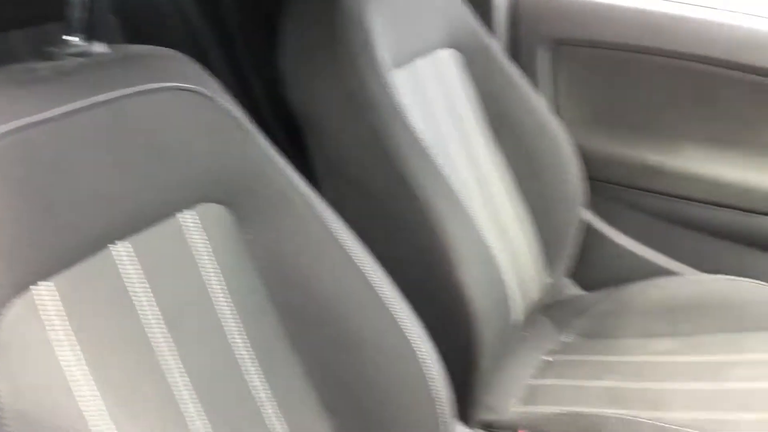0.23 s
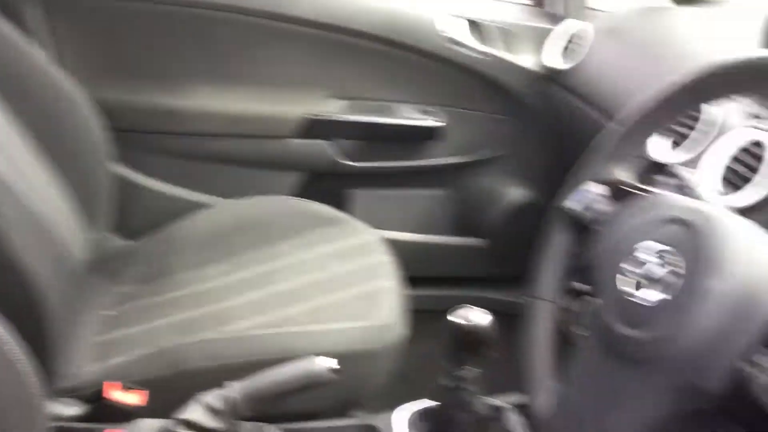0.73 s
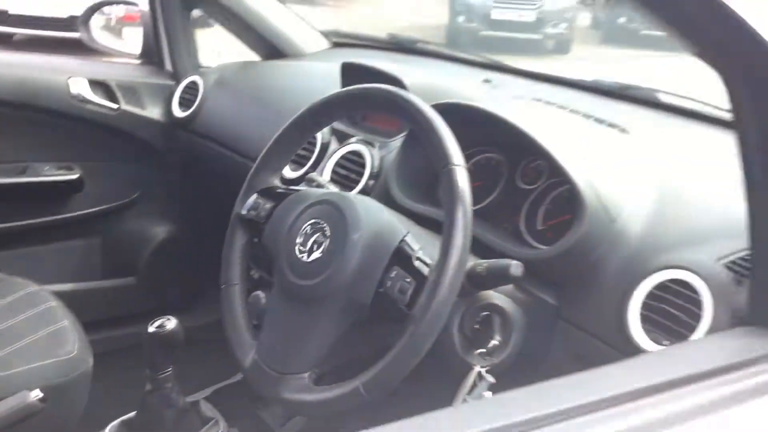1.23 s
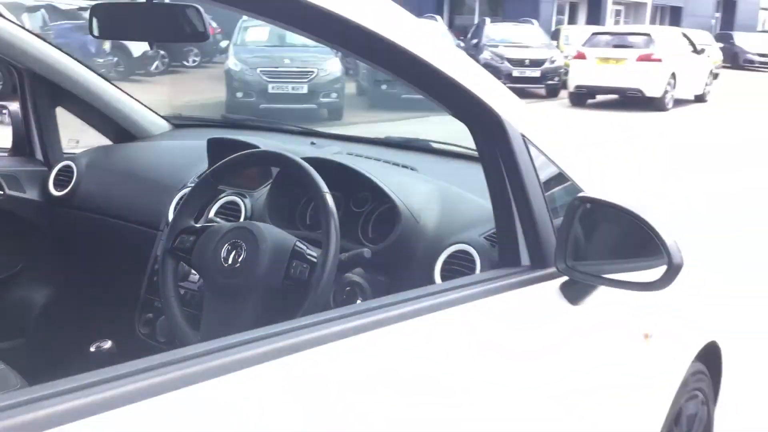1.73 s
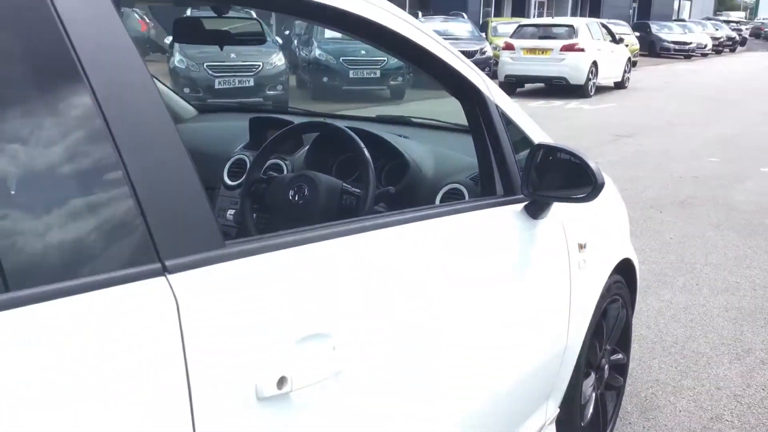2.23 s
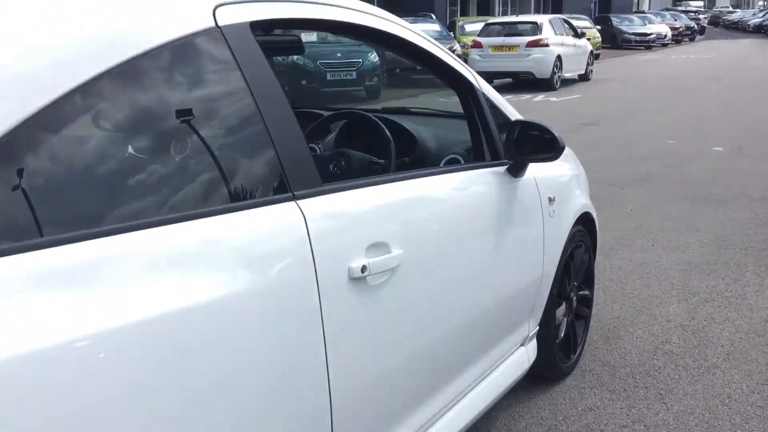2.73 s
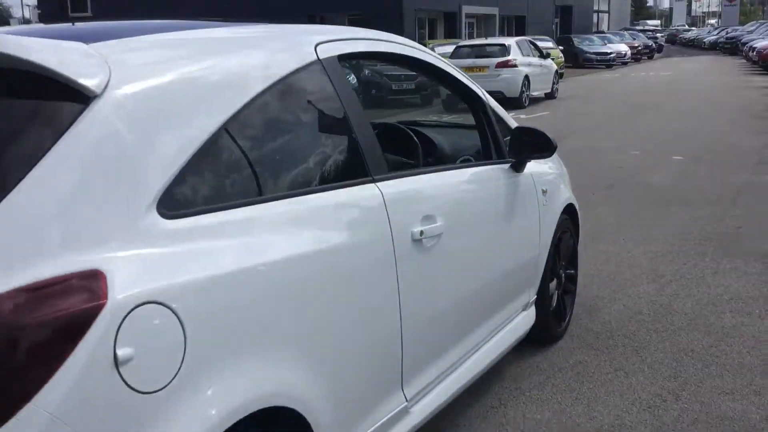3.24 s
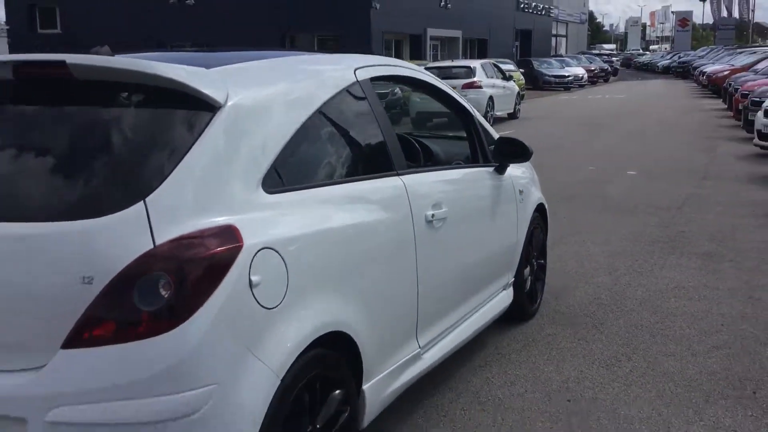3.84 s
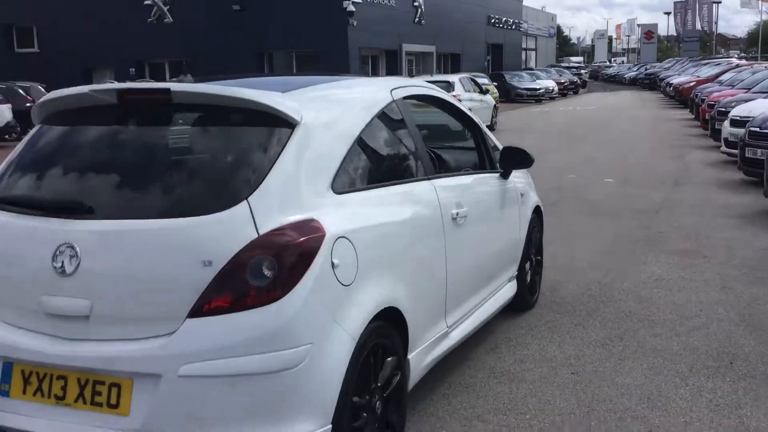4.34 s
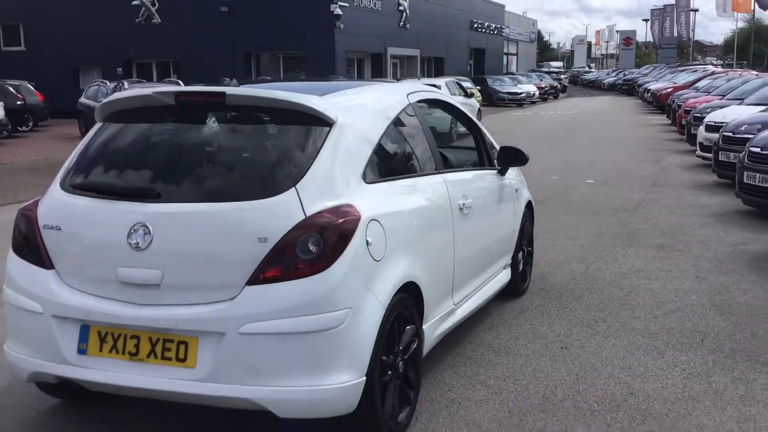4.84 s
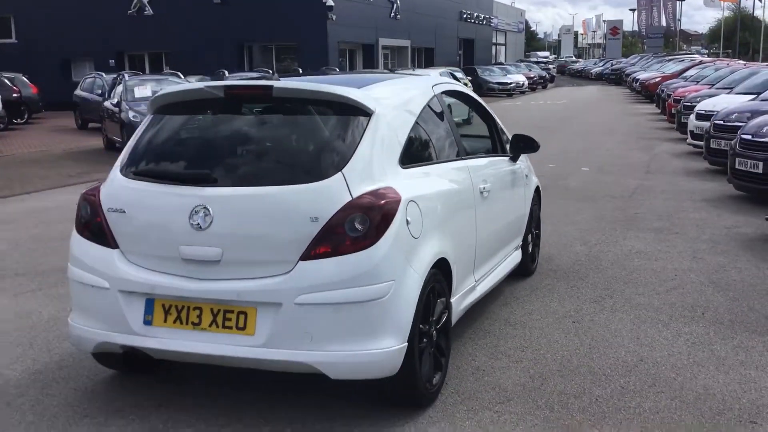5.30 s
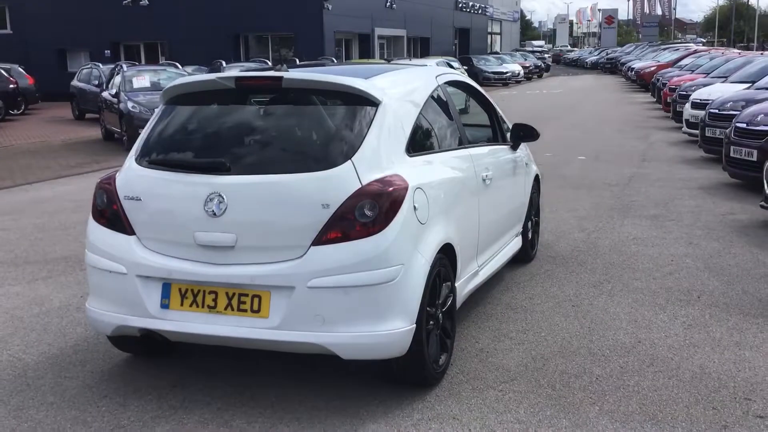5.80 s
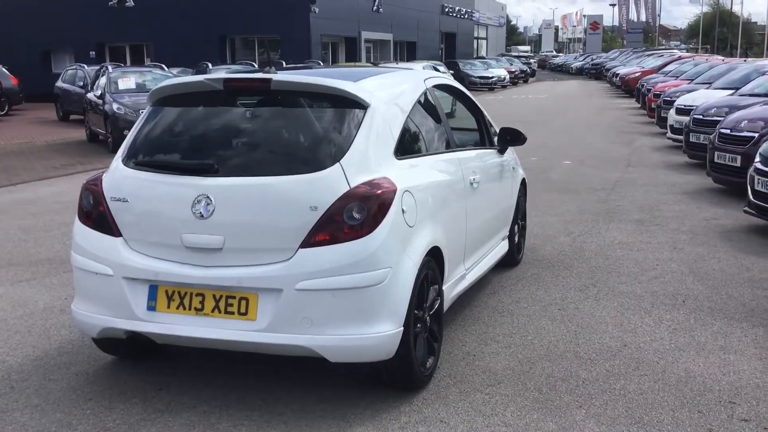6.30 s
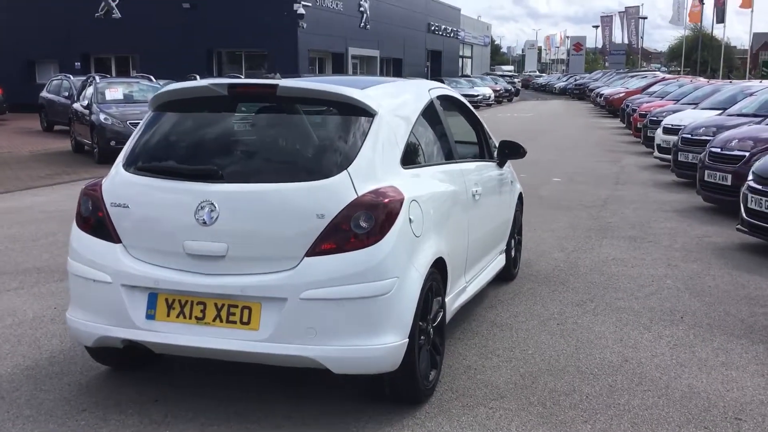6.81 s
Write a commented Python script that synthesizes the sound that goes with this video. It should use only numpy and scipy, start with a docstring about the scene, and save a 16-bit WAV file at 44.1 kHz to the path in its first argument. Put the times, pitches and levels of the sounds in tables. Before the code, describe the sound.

A handheld microphone on an open car lot picks up soft distant traffic and low wind rumble. Light knocks come first, then a double clunk, a hard loud bang with a brief rattle, and a cluster of deep hollow thumps on a thin panel. The knocks stop around the middle, wind buffets briefly, and a low, wavering motor hum takes over until the end, with a faint shoe scuff.

```python
"""On a car forecourt, outdoors: dull knocks and ticks reach the microphone, the knocks through a thin panel
that passes their treble first and their bass last. Knocks are bands of sound swept by the panel's delay.
Distant traffic and wind on the microphone port are shaped noise, as is the scuffing of shoes close to the ticks
of filtered clicks. In the second half a motor hum of four sine partials swells.
A hand-held recorder turns its gain down after loud knocks."""
import sys
import numpy as np
from scipy import signal
from scipy.fft import rfft, irfft, next_fast_len
from scipy.io import wavfile

SR = 44100
rng = np.random.default_rng(int(sys.argv[2]) if len(sys.argv) > 2 else 0)


def natural_amplitude(level_db):
    """Convert a level in decibels to a linear amplitude factor, elementwise."""
    exponent = np.asarray(level_db, float) / 20
    return 10 ** exponent


def put_to_file(sound):
    """Save the sound as 16-bit audio at rate SR, in the file named by the first command-line argument."""
    columns = np.atleast_2d(sound).T  # one column per channel
    safe = np.clip(columns, -1, 1)
    whole_steps = np.round(safe * 32767)
    wavfile.write(sys.argv[1], SR, whole_steps.astype(np.int16))


N = 311345

# Far traffic: t/s, roar level/dB, tyre level/dB, sizzle level/dB, hiss level/dB
TRAFFIC_LEVELS = [(0.0, -46.5, -43, -63, -58.5), (0.3, -47.5, -43, -66, -61.5),
                  (0.82, -45, -48, -80, -63.5), (1.11, -46.5, -47.5, -64, -64),
                  (1.55, -46, -45, -57.5, -62), (2.0, -44.5, -49, -69, -62.5), (2.75, -42, -48.5, -71, -63),
                  (3.2, -43.5, -47.5, -65.5, -62), (3.7, -44, -50, -72, -63), (4.5, -43, -48.5, -77, -62.5),
                  (4.9, -43, -47, -77.5, -60.5), (5.61, -43.5, -47.5, -72, -62),
                  (6.2, -41, -47.5, -60.5, -61.5), (6.7, -41, -43.5, -52, -59),
                  (7.06, -41, -44.5, -57, -56)]
# Spectra of the four traffic layers, low to high: f/Hz, density level/dB
ROAR_SPECTRUM = [(240, -28), (400, -2.5), (455, -4.5), (698, -0.5), (986, 0), (1300, -10), (1690, -22.5),
                 (2860, -120)]
TYRE_SPECTRUM = [(710, -14.5), (1200, 0), (2150, -9), (2700, -21), (3500, -25.5), (4500, -44.5)]
SIZZLE_SPECTRUM = [(1400, -29.5), (2000, -0.5), (2700, 4), (3500, -6), (4500, -31.5)]
HISS_SPECTRUM = [(1800, -19.5), (2700, -3.5), (3200, 0.5), (4000, 2.5), (5000, -2.5), (6300, -14),
                 (8000, -21.5), (10000, -25.5), (13000, -35), (15500, -34), (17000, -78.5)]

# Wind on the microphone port: t/s, rumble level/dB, flutter level/dB
WIND_LEVELS = [(0.0, -40, -44), (0.5, -39.5, -43), (1.02, -42.5, -46.5), (1.4, -38, -45.5),
               (1.8, -35.5, -43), (2.1, -42.5, -48), (2.35, -36.5, -37), (2.8, -36.5, -38.5),
               (3.05, -27, -37.5), (3.2, -28.5, -34.5), (3.45, -27.5, -35.5), (3.66, -22.5, -32),
               (3.95, -32.5, -42.5), (4.33, -30, -39), (4.6, -36.5, -42), (5.5, -37.5, -38.5),
               (6.2, -38.5, -40.5), (7.06, -38.5, -36)]
# Spectra of the two wind layers: f/Hz, density level/dB
RUMBLE_SPECTRUM = [(15, -50), (25, -31), (43, -12), (81, -1), (97, -3.5), (170, -6.5), (220, -27.5),
                   (370, -120)]
FLUTTER_SPECTRUM = [(88, -34.5), (150, -5.5), (189, -1), (236, 4.5), (387, -11), (500, -22.5), (650, -39.5),
                    (1100, -120)]

# Knocks on the panel: t/s, crack level/dB, body level/dB, body centre f/Hz, edge level/dB
KNOCKS = [(0.646, -29, -33, 900, -55), (.672, -35, -35, 900, -66), (0.687, -34, -35, 900, -65),
          (0.8284, -28.5, -20.5, 580, -34.5), (1.1472, -40, -21.5, 920, -61), (1.1484, -22, -16, 620, -49),
          (1.159, -34, -23.5, 296, -58), (1.9144, -17.5, -16.5, 354, -29.5),
          (1.9168, -18.5, -17.5, 695, -31), (1.9622, -16, -26, 1020, -23.5), (1.9636, -18, -50, 990, -45),
          (2.1213, -53, -22.5, 370, -75), (2.8785, -38, -19.5, 345, -50), (2.8856, -20.5, -14.5, 570, -44),
          (2.8894, -28, -10.5, 235, -55), (2.9565, -35, -14.5, 434, -53), (3.1128, -28, -10.5, 405, -50),
          (3.1886, -25, -15, 486, -65), (3.3438, -42, -37, 500, -50), (3.346, -28, -17.5, 510, -34),
          (3.527, -25.5, -16.5, 463, -45)]
# Bands of a knock, crack then edge: centre f/Hz, width/octaves
KNOCK_BANDS = [(2000, 0.48), (5500, 0.34)]
# Heavy blows that push the whole panel: t/s, thump level/dB
THUMPS = [(0.8272, -18), (1.1479, -24.5), (1.16, -24), (1.914, -6), (2.8891, -38), (3.113, -24),
          (3.1877, -11.5), (3.347, -21), (3.5267, -9)]

# Faint dry ticks: t/s, click level before the high-pass/dB
TICKS = [(0.83, -26), (1.012, -51), (1.149, -31), (1.2385, -51.5), (1.917, -46), (6.797, -59)]

# Shoes scuffing on asphalt: t/s, length/s, level/dB
SCUFFS = [(3.246, 0.083, -66), (5.446, 0.099, -54.5)]
# Spectrum of the scuffs: f/Hz, density level/dB
SCUFF_SPECTRUM = [(1200, -32), (2300, 7), (3200, -10.5), (4600, 4), (6500, -18), (11000, -30), (16000, -41)]

# Motor hum: t/s, first partial level/dB, second partial level/dB, third partial level/dB
HUM_LEVELS = [(3.75, -39, -39.5, -44), (4.14, -44, -33, -31.5), (4.38, -31, -33, -35.5),
              (4.66, -34.5, -33.5, -42), (4.84, -31, -29.5, -33), (4.99, -35, -37, -46),
              (5.14, -36, -36.5, -29), (5.3, -32, -34.5, -32), (5.55, -32, -35.5, -37.5),
              (5.67, -32.5, -27, -39), (5.85, -52, -31.5, -36.5), (5.97, -44, -34, -47),
              (6.07, -37.5, -26, -36), (6.21, -36, -27, -50), (6.3, -39, -33.5, -31.5),
              (6.48, -44, -41.5, -48), (6.58, -34, -33.5, -39), (6.72, -36, -50, -53),
              (6.86, -41.5, -30.5, -47), (7.06, -59, -35, -43)]
# Pitch of the hum's first partial: t/s, f/Hz
HUM_PITCH = [(3.75, 84.4), (4.3, 84.3), (4.9, 83.3), (5.5, 82.7), (5.8, 82.9), (6.1, 83.9), (7.06, 84.6)]

BODY_OCTAVES = 0.7
THUMP_HZ, THUMP_OCTAVES = 101.8, 0.7
# a frequency lags behind the blow by cycles / (f + knee) seconds
LAG_CYCLES, LAG_KNEE_HZ = 1.65, 45
CRACK_LAG_SHARE = 0.3  # treble comes partly through the air and is swept less
ECHO_GAIN, ECHO_LATEST_S = 0.33, 0.0016
RATTLE_DB, RATTLE_T60_S, RATTLE_TOP_HZ = -17.5, 0.041, 4850  # level re crack
RING_DB, RING_T60_S, RING_HZ = -15, 0.035, 2403  # level re crack
AFTER_SOUND_RISE_S = 0.0015
FOURTH_PARTIAL_DB, FOURTH_WAVERS_DB = -56, 5
BASS_CUT_HZ = 35
DUCK_ABOVE_DB, DUCK_SHARE, DUCK_RECOVERY_DB_S = -13, 0.3, 23


def rms_one(x):
    """Scales to rms 1."""
    return x / np.sqrt(np.mean(x ** 2) + 1e-20)


def in_time(rows):
    """Columns of a time table, one value per sample."""
    s, *columns = np.transpose(rows)
    return [np.interp(np.arange(N) / SR, s, column) for column in columns]


def drift(rate):
    """Slow chance of spread 1: noise at every 40th sample through two one-pole low-passes at rate, in Hz."""
    r = np.exp(-80 * np.pi * rate / SR)
    noise = rng.standard_normal(N // 40 + 2002)
    slow = signal.lfilter([1], [1, -2 * r, r * r], noise)[2000:]  # the filter has settled
    return np.interp(np.arange(N) / 40, np.arange(len(slow)), rms_one(slow))


def coloured(spectrum, lump_db, lump_rate):
    """Noise of the given spectrum whose level comes in lumps; rms 1."""
    size = next_fast_len(N)
    hz = np.arange(1, size // 2 + 2) * SR / size
    point_hz, point_db = np.transpose(spectrum)
    shape = natural_amplitude(np.interp(np.log(hz), np.log(point_hz), point_db, left=-90, right=-90))
    noise = irfft(rfft(rng.standard_normal(size)) * shape, size)[:N]
    return rms_one(noise * natural_amplitude(lump_db * drift(lump_rate)))


def traffic():
    """Distant road noise, nearly smooth, in four layers that swell as cars pass."""
    roar_db, tyre_db, sizzle_db, hiss_db = in_time(TRAFFIC_LEVELS)
    roar = natural_amplitude(roar_db) * coloured(ROAR_SPECTRUM, lump_db=0.2, lump_rate=7.5)
    tyres = natural_amplitude(tyre_db) * coloured(TYRE_SPECTRUM, lump_db=1.1, lump_rate=20.0)
    sizzle = natural_amplitude(sizzle_db) * coloured(SIZZLE_SPECTRUM, lump_db=0.0, lump_rate=17.0)
    hiss = natural_amplitude(hiss_db) * coloured(HISS_SPECTRUM, lump_db=0.4, lump_rate=30.0)
    return roar + tyres + sizzle + hiss


def wind():
    """Eddies at the microphone port: lumpy low rumble with a faster flutter above it."""
    rumble_db, flutter_db = in_time(WIND_LEVELS)
    rumble = natural_amplitude(rumble_db) * coloured(RUMBLE_SPECTRUM, lump_db=3.0, lump_rate=9.0)
    flutter = natural_amplitude(flutter_db) * coloured(FLUTTER_SPECTRUM, lump_db=2.0, lump_rate=23.0)
    return rumble + flutter


def knocks():
    """Bending waves run slower the lower they are, so each blow arrives as a short falling sweep."""
    size, lead = 8192, 256  # samples; the lead leaves room ahead of the blow
    hz = np.arange(1, size // 2 + 2) * SR / size
    t = np.arange(size - lead) / SR
    out = np.zeros(N + size)
    lag = LAG_CYCLES * np.log(1 + hz / LAG_KNEE_HZ)  # phase, in cycles
    start = hz * lead / SR
    sweep = np.exp(-2j * np.pi * (lag + start))
    direct = np.exp(-2j * np.pi * (CRACK_LAG_SHARE * lag + start))
    rise = 1 - np.exp(-t / AFTER_SOUND_RISE_S)
    buzz = signal.butter(3, [RATTLE_TOP_HZ / 4, RATTLE_TOP_HZ], "band", fs=SR, output="sos")
    crack_band, edge_band = KNOCK_BANDS

    def part(centre_hz, octaves, travel):
        """One band of a blow after its travel, peak 1."""
        band = np.exp(-0.5 * (np.log2(hz / centre_hz) / octaves) ** 2)
        wave = irfft(band * travel, size)
        return wave / np.abs(wave).max()

    for s, crack_db, body_db, body_hz, edge_db in KNOCKS:
        # near edges of the panel return the blow within two milliseconds and colour it unevenly
        delays = rng.uniform(0.0001, ECHO_LATEST_S, 3)
        echoes = sum(ECHO_GAIN * np.exp(-2j * np.pi * hz * delay) for delay in delays)
        colour = 1 + echoes * hz / (hz + 2500)  # echoes are weaker in the bass
        blow = natural_amplitude(crack_db) * part(*crack_band, direct * colour)
        blow += natural_amplitude(edge_db) * part(*edge_band, direct * colour)
        blow += natural_amplitude(body_db) * part(body_hz, BODY_OCTAVES, sweep * colour)
        # loose parts buzz briefly after the crack
        rattle = rms_one(signal.sosfilt(buzz, rng.standard_normal(size - lead)))
        blow[lead:] += rise * natural_amplitude(crack_db + RATTLE_DB - 60 * t / RATTLE_T60_S) * rattle
        # a small hard part rings, its pitch a little different each time
        ring = np.sin(2 * np.pi * RING_HZ * (1 + 0.032 * rng.standard_normal()) * t)
        blow[lead:] += rise * natural_amplitude(crack_db + RING_DB - 60 * t / RING_T60_S) * ring
        at = round(s * SR) - lead
        out[at:at + size] += blow
    for s, thump_db in THUMPS:
        at = round(s * SR) - lead
        out[at:at + size] += natural_amplitude(thump_db) * part(THUMP_HZ, THUMP_OCTAVES, sweep)
    return out[:N]


def ticks():
    """Single clicks, high-passed so that only the top treble is left."""
    clicks = np.zeros(N)
    for s, db in TICKS:
        clicks[round(s * SR)] = natural_amplitude(db)
    top_treble = signal.butter(3, 7900, "high", fs=SR, output="sos")
    return signal.sosfilt(top_treble, clicks + 1e-18)  # inaudible offset


def scuffs():
    """Shoes rub on asphalt: short swells of gritty noise."""
    t = np.arange(N) / SR
    swell = sum(natural_amplitude(db) * np.exp(-0.5 * ((t - s) / (length / 2)) ** 2) for s, length, db in SCUFFS)
    return swell * coloured(SCUFF_SPECTRUM, lump_db=3.5, lump_rate=180.0)


def hum():
    """Four partials of one near-steady pitch swell and fade as the listener moves, the faint fourth at random."""
    pitch_hz = in_time(HUM_PITCH)[0] * (1 + 0.0018 * drift(8.1))
    turns = np.cumsum(pitch_hz) / SR
    fade_in = np.clip((np.arange(N) / SR - HUM_LEVELS[0][0]) / 0.19 + 1, 0, 1)
    levels_db = in_time(HUM_LEVELS) + [FOURTH_PARTIAL_DB + FOURTH_WAVERS_DB * drift(3.0)]
    tones = np.zeros(N)
    for number, level_db in enumerate(levels_db, 1):
        tone = np.sin(2 * np.pi * (number * turns + rng.random()))
        tones += natural_amplitude(level_db + 1.3 * drift(15.0)) * tone
    return np.sqrt(2) * fade_in * tones  # sine peak from rms


def scene():
    """All sources at one microphone, eased in and out over 4 ms."""
    n = np.arange(N)
    ease = np.clip(np.minimum(n, N - 1 - n) / (0.004 * SR), 0, 1)
    mix = traffic() + wind() + knocks() + ticks() + scuffs() + hum()
    return (ease * mix)[None]


def low_pass(x):
    """Removes everything above the highest recorded frequency."""
    return signal.sosfilt(signal.butter(12, 15700, fs=SR, output="sos"), x)


def record(dry):
    """Hand-held recorder: the lowest bass is cut; gain drops after loud peaks and creeps back."""
    dry = signal.sosfilt(signal.butter(2, BASS_CUT_HZ, "high", fs=SR, output="sos"), dry)
    level_db = 20 * np.log10(np.abs(dry[0]) + 1e-9)
    # peaks are held, then fall at a constant rate
    recovery_db = DUCK_RECOVERY_DB_S * np.arange(N) / SR
    held_db = np.maximum.accumulate(level_db + recovery_db) - recovery_db
    duck_db = -DUCK_SHARE * np.maximum(held_db - DUCK_ABOVE_DB, 0)
    r = np.exp(-1 / (0.014 * SR))  # gain moves with a 14 ms time constant
    gain_db = signal.lfilter([1 - r], [1, -r], duck_db)
    return low_pass(dry * natural_amplitude(gain_db))


dry = scene()
out = record(dry)
put_to_file(out)
```